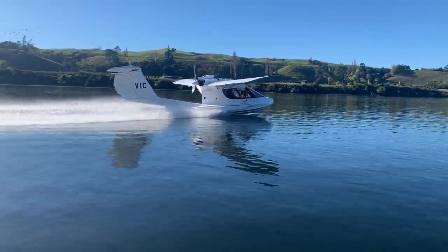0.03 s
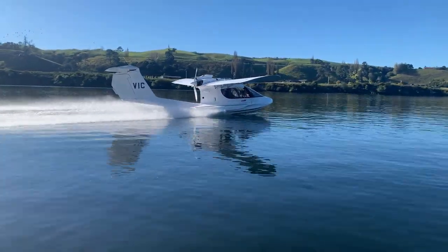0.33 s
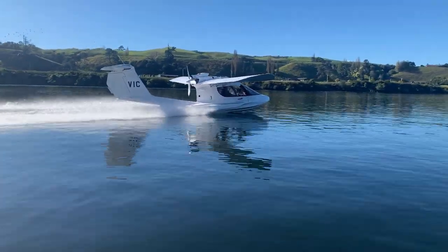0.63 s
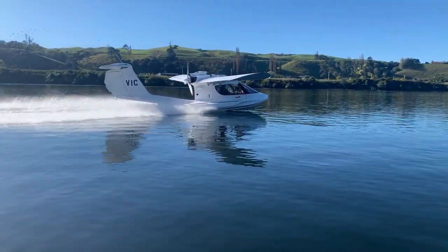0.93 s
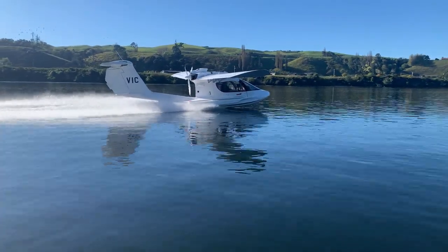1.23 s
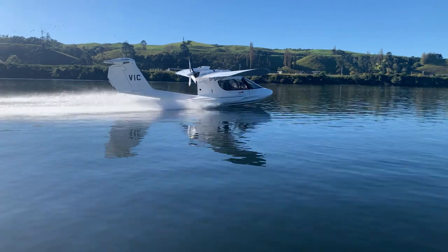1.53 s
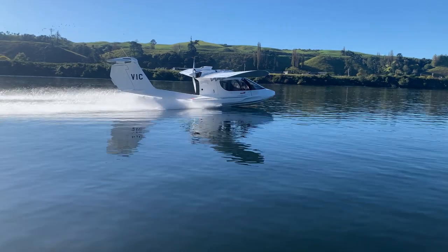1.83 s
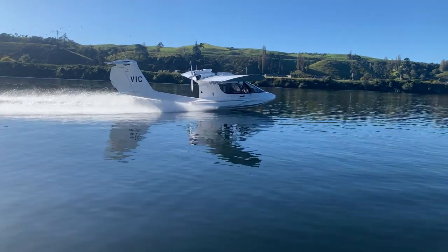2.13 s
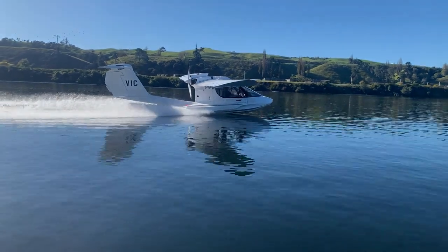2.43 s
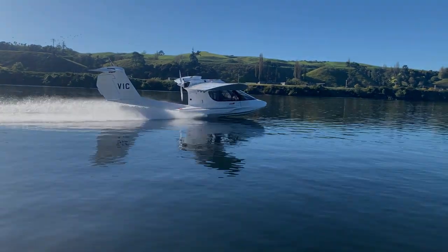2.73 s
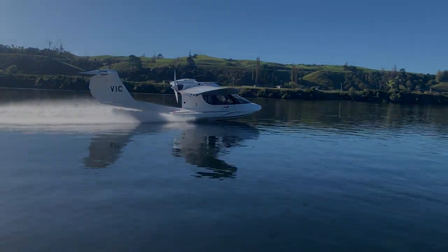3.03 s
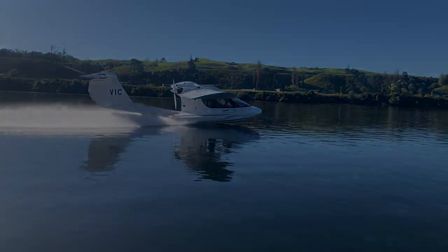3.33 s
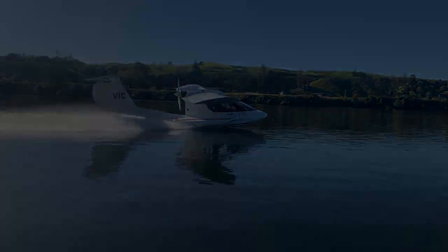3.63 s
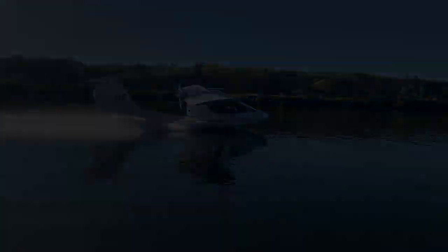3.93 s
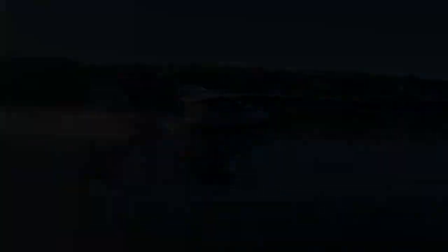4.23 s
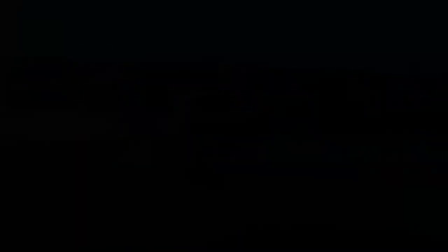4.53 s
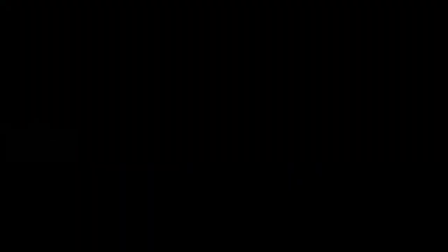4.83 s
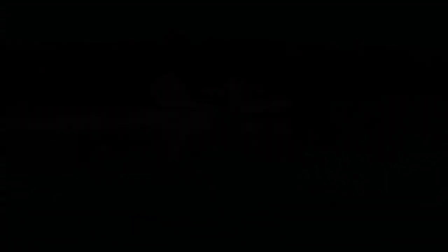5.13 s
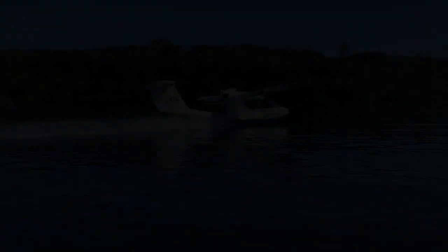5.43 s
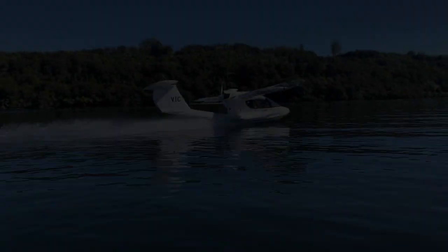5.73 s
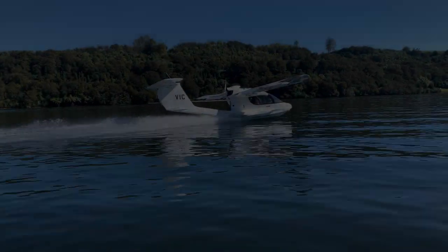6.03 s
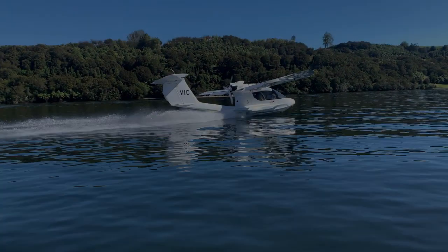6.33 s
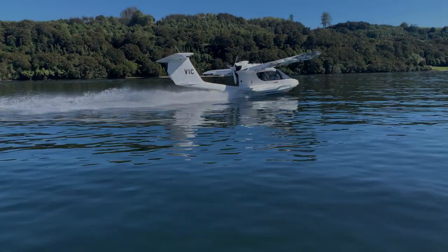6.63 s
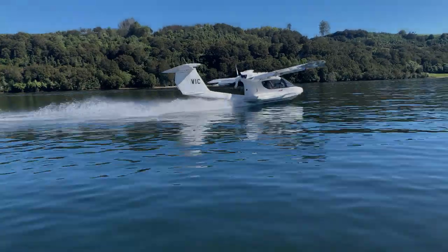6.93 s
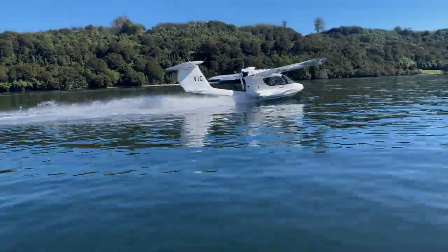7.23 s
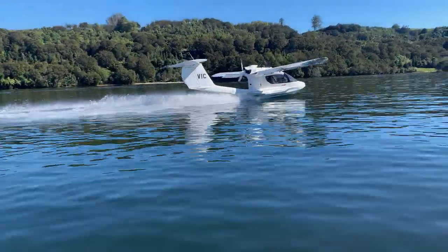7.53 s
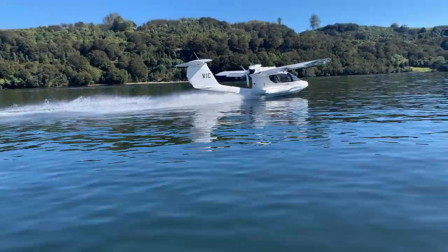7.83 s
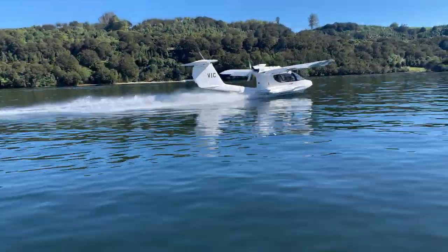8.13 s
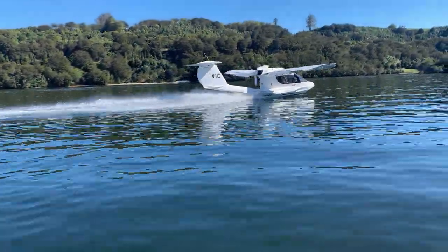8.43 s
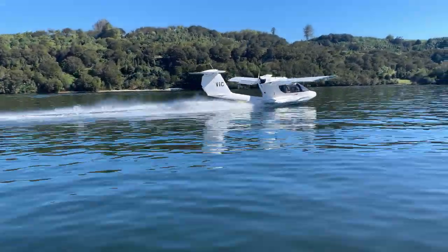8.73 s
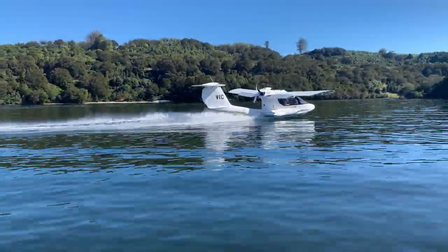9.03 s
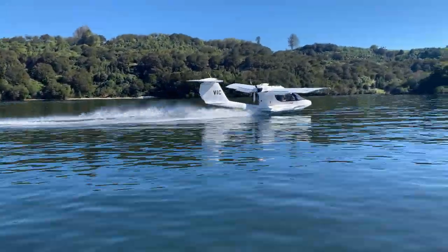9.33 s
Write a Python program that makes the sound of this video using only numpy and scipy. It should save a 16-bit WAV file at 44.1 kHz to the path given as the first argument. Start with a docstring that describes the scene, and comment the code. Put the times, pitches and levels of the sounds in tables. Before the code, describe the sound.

A small seaplane skims a lake, its propeller droning and its hull throwing hissing spray, heard from a humming motorboat alongside. Wind buffets the microphone. The propeller sinks away, the boat's wake washes up twice with hollow bubbling, and a wave slaps. Everything fades out, then returns with steadier, more distant spray, both engines, gurgles and surging splashes, while drops spatter nearby.

```python
"""A small seaplane planes across a lake, its propeller droning and its hull throwing up hissing spray.
It is heard from a motorboat alongside, in two runs joined by a fade. The boat's engine hums, its wake
washes up twice with resonating bubbles, water slaps and gurgles at its side, and drops spatter nearby.
Wind buffets a closely spaced pair of microphones."""
import sys
import numpy as np
from scipy import signal
from scipy.fft import rfft, irfft
from scipy.io import wavfile
from scipy.ndimage import uniform_filter1d, minimum_filter1d

SR = 44100
rng = np.random.default_rng(int(sys.argv[2]) if len(sys.argv) > 2 else 0)


def dump_mix(stems):
    """Bounce the given channels to the path in sys.argv[1] as a 16-bit WAV at rate SR."""
    frames = np.atleast_2d(stems).T  # one column per channel
    limited = np.clip(frames, -1, 1)  # hard clip at full scale
    pcm = np.round(limited * 32767).astype(np.int16)
    wavfile.write(sys.argv[1], SR, pcm)


N = 418950
TIME = np.arange(N) / SR
EDGE_HZ = 15650
FRAMING = dict(nperseg=1024, noverlap=768)

# Second-run spray and splash at the microphone pair.
# Each row: frequency in Hz, in-phase coherence, quadrature coherence, left over right in dB.
SECOND_STEREO = [(280, 1.0, 0.0, -2), (420, 0.82, 0.14, 3), (610, 0.3, -0.28, -2.5),
                 (640, -0.6, -0.11, -3.5), (990, 0.67, -0.19, 1.5), (1380, 0.17, 0.37, 4),
                 (2020, 0.15, 0.1, 0.5), (2740, -0.31, 0.47, -3.5), (4180, 0.38, 0.11, -3.5),
                 (5230, -0.28, 0.22, 0), (6200, 0.27, 0.064, -1), (7560, 0.68, 0.0, -0.5),
                 (10300, -0.75, -0.039, 0), (13000, 0.83, -0.05, -0.0)]


def gain_of(db):
    """Decibels to amplitude."""
    return 10 ** (np.asarray(db) / 20)


def unit_rms(x):
    """Scales to rms 1."""
    return x / np.sqrt(np.mean(x ** 2) + 1e-20)


def over_time(rows):
    """Each column of a time table at every sample."""
    times_s, *columns = np.transpose(rows)
    return [np.interp(TIME, times_s, column) for column in columns]


def over_frequency(rows, hz):
    """Each column of a frequency table at hz, interpolated on a log axis."""
    knots_hz, *columns = np.transpose(rows)
    return [np.interp(np.log(hz + 1), np.log(knots_hz + 1), column) for column in columns]


def wander(rate_hz):
    """Random drift of rms 1, low-passed at rate_hz."""
    steps_s = TIME[::100]
    hz = np.fft.rfftfreq(len(steps_s), steps_s[1])
    drift = irfft(rfft(rng.standard_normal(len(steps_s))) / (1 + (hz / rate_hz) ** 4), len(steps_s))
    return np.interp(TIME, steps_s, unit_rms(drift))


def swell(crest_s, hold_s, rise_s, fall_s):
    """Gaussian rise to 1, hold, exponential fall."""
    early_s, late_s = np.maximum(crest_s - TIME, 0), np.maximum(TIME - crest_s - hold_s, 0)
    return np.exp(-np.minimum((early_s / rise_s) ** 2 + late_s / fall_s, 20))


def band(x, low_hz, high_hz):
    """Band-pass, scaled to rms 1."""
    sos = signal.butter(2, [low_hz, high_hz], "bandpass", fs=SR, output="sos")
    return unit_rms(signal.sosfilt(sos, x))


def impacts(shape, per_s, spread_db):
    """Randomly timed impulses, mostly small."""
    size = gain_of(spread_db * np.minimum(rng.exponential(1, shape), 3))
    return size * (rng.random(shape) < per_s / SR)


def pops(per_s, spread_db, low_hz, high_hz, crosstalk=1.0):
    """Drops or bubbles pop close by; crosstalk 1 centres them."""
    ticks = impacts((2, N), per_s, spread_db) * rng.choice([-1., 1.], (2, N))
    return band(ticks + crosstalk * ticks[::-1], low_hz, high_hz)


def water(colour, stereo, per_s, spread_db, drop_share, clump_db, patchy_db, mist_hz=8000):
    """Falling water: hiss and drops in clumps, partly coherent in stereo; mist keeps the top smooth."""
    drops = unit_rms(impacts(N, per_s, spread_db) * rng.choice([-1., 1.], (2, N)))
    clumps = gain_of(clump_db * wander(93))
    hz, _, hiss = signal.stft(clumps * rng.standard_normal((2, N)), SR, **FRAMING)
    patter = signal.stft(clumps * drops, SR, **FRAMING)[2]
    hz = hz[:, None]
    share = drop_share / (1 + (hz / mist_hz) ** 2)
    left, independent = np.sqrt(1 - share) * hiss + np.sqrt(share) * patter
    in_phase, quadrature, balance_db = over_frequency(stereo, hz)
    width = np.clip((hz - 250) / 90, 0, 1)  # mono bass
    coherence = 1 + width * (in_phase + 1j * quadrature - 1)
    coherence /= np.maximum(abs(coherence), 1)
    right = coherence.conj() * left + np.sqrt(np.maximum(1 - abs(coherence) ** 2, 0)) * independent
    balance = gain_of(width * balance_db)
    pair = np.array([left * balance, right]) / np.sqrt(1 + balance ** 2)
    patches = uniform_filter1d(rng.standard_normal(left.shape), 9, axis=0)
    patches = unit_rms(uniform_filter1d(patches, 8, axis=1))  # 9 bins by 8 frames
    pair *= gain_of(over_frequency(colour, hz)[0] + patchy_db * patches)
    return unit_rms(signal.istft(pair, **FRAMING)[1][:, :N])


def drone(curve, lines, wobble, waver_db, fray_rad, dulling=0.0, throb_db=0.0, throb_hz=3.9):
    """Tones of a shaft whose speed wobbles; moving air wavers them and frays the higher ones most."""
    hz, level_db = over_time(curve)
    cycles = np.cumsum(hz * (1 + wobble * wander(7.9))) / SR
    slope_db_per_oct = dulling * (level_db - level_db.max())
    tones = np.zeros(N)
    for multiple, db in lines:
        jitter_rad = fray_rad * (multiple - 1) * wander(22.4)
        swing_db = throb_db * min(multiple - 1, 1) * wander(throb_hz)
        line_db = db + slope_db_per_oct * np.log2(multiple) + waver_db * wander(11.4) + swing_db
        tones += gain_of(line_db) * np.cos(2 * np.pi * (multiple * cycles + rng.random()) + jitter_rad)
    return np.sqrt(2) * gain_of(level_db) * tones


def wind(run, breeze_db=-35.5, eddy_s=0.083):
    """Eddies thump both microphones alike; gusts over a light breeze set their force."""
    # Rumble spectra. Each row: frequency in Hz, relative level in dB.
    first_colour = [(10, -33), (22, -18.5), (35, -31), (50, -1), (75, 5.5), (120, 2), (170, -17.5),
                    (260, -11), (600, -54), (2000, -83)]
    second_colour = [(10, -32), (22, -27), (35, -7), (50, -2.5), (80, 2.5), (125, 4.5), (180, -8),
                     (260, -9), (600, -53), (2000, -80)]
    # Each row: crest in seconds, hold in seconds, relative strength in dB.
    gusts = [(0.032, 0.043, -20.5), (0.282, 0.07, -21.5), (0.468, 0.16, -23.5), (0.657, 0.05, -21),
             (0.905, 0.077, -21.5), (1.29, 0.057, -20.5), (1.45, 0.17, -25), (1.7, 0.44, -29),
             (3.65, 0.41, -32), (4.3, 0.041, -33), (5.7, 0.22, -26), (5.94, 0.12, -25.5),
             (6.133, 0.16, -24), (6.48, 0.07, -25), (7.25, 0.19, -23.5), (7.54, 0.15, -23.5),
             (7.9, 0.04, -28), (8.22, 0.098, -24.5), (8.46, 0.03, -35), (8.67, 0.09, -22.5)]
    colour, gain_db = (first_colour, 5.0) if run == 1 else (second_colour, 2.5)
    force = gain_of(breeze_db)
    for crest_s, hold_s, db in gusts:
        force = np.maximum(force, gain_of(db) * swell(crest_s, hold_s, rise_s=0.045, fall_s=0.046))
    spectrum = gain_of(over_frequency(colour, np.fft.rfftfreq(N, 1 / SR))[0])
    rumble = irfft(rfft(rng.standard_normal(N)) * spectrum, N)
    local_rms = np.sqrt(uniform_filter1d(rumble ** 2, round(eddy_s * SR)))
    return gain_of(gain_db) * force * rumble / local_rms


def droplets():
    """Fine drops fizz near the microphones."""
    # Each row: time in seconds, level in dB.
    levels = [(0, -41.5), (1.65, -48), (2.1, -49), (3.0, -56), (3.5, -53), (3.9, -46.5), (4.6, -49.5)]
    return gain_of(over_time(levels)[0]) * pops(per_s=310, spread_db=4.0, low_hz=6960, high_hz=13500)


def gurgles():
    """Large bubbles churn along the side of the boat."""
    # Each row: crest in seconds, hold in seconds, level in dB.
    churns = [(7.2, 0.34, -39), (7.65, 0.35, -36.5), (8.65, 0.13, -33.5)]
    force = sum(gain_of(db) * swell(s, hold_s, rise_s=0.15, fall_s=0.059) for s, hold_s, db in churns)
    return force * pops(per_s=500, spread_db=3.5, low_hz=302, high_hz=534, crosstalk=0.91)


def slap(crest_s=4.281, level_db=-19, pitches_hz=(350, 480)):
    """Two air pockets trapped between a wave and the boat ring briefly."""
    ring = sum(np.sin(2 * np.pi * hz * (TIME - crest_s)) for hz in pitches_hz)
    return gain_of(level_db) * swell(crest_s, hold_s=0.009, rise_s=0.0042, fall_s=0.005) * ring


def spatters(ring_db=-3, fall_s=0.0014, band_ratio=1.95):
    """Large drops crack on the water close by, each with a very short ring."""
    # Each row: start in seconds, level in dB, pitch in Hz.
    drops = [(0.193, -17, 2500), (0.442, -22, 2700), (1.854, -27, 6300), (2.055, -18, 2200),
             (2.663, -30, 6000), (3.798, -20, 1890), (3.888, -22, 2000), (4.101, -31, 5500),
             (4.197, -20, 2100), (4.371, -24, 2700), (5.777, -22, 2800), (6.228, -20, 1800),
             (7.069, -21, 2030), (7.16, -24, 2900), (8.109, -27, 2600), (8.499, -24, 3370),
             (8.658, -30, 5500), (8.857, -24, 3000), (9.06, -22, 2500), (9.116, -21, 2100),
             (9.182, -24, 3800), (9.201, -27, 3800), (9.363, -23, 2260), (9.48, -23, 3210)]
    t = np.arange(1024) / SR
    track = np.zeros((2, N + len(t)))
    for start_s, db, hz in drops:
        noise = rng.standard_normal(len(t)) + .5 * rng.standard_normal((2, len(t)))
        crack = band(noise, hz / band_ratio, min(hz * band_ratio, EDGE_HZ))
        ring = gain_of(ring_db) * np.sin(2 * np.pi * hz * t)
        start = round(start_s * SR)
        track[:, start:start + len(t)] += gain_of(db) * np.exp(-t / fall_s) * (crack + ring)
    return track[:, :N]


def bubble_cloud(wash, tilt_db_per_oct, boost_db, pivot_hz=600, width_hz=173):
    """Tilts the wash and boosts its bubble resonance, which rises as the cloud breaks up."""
    # Each row: time in seconds, mean resonance in Hz.
    pitches = [(1.65, 335), (1.88, 360), (2.1, 490), (2.4, 510), (3.5, 471), (3.75, 520), (4.0, 565),
               (4.3, 490)]
    hz, frames_s, spectra = signal.stft(wash, SR, **FRAMING)
    hz = hz[:, None] + 1
    octaves = np.clip(np.log2(hz / pivot_hz), -2, 2)
    centre_hz = np.interp(frames_s, TIME, over_time(pitches)[0] * (1 + 0.23 * wander(16)))
    resonance_db = np.interp(frames_s, TIME, boost_db) / (1 + (2 * (hz - centre_hz) / width_hz) ** 2)
    spectra = spectra * gain_of(octaves * np.interp(frames_s, TIME, tilt_db_per_oct) + resonance_db)
    return signal.istft(spectra, **FRAMING)[1][:, :N]


def wake(ebb_s=0.9, thin_db_per_oct=3.5):
    """Each surge of the boat's wake starts splashy, turns hollow at its crest and thins as it ebbs."""
    # Wash spectrum. Each row: frequency in Hz, relative level in dB.
    colour = [(40, -19), (150, 0.5), (230, -3), (320, -2), (430, -1), (700, -2), (880, -5.5), (1100, -2),
              (1700, -6.5), (3500, -18), (5200, -28.5), (15500, -66)]
    # Wash at the microphones. Columns as in SECOND_STEREO.
    stereo = [(229, 1.0, 0.12, -2), (380, 0.84, -0.026, 0), (534, 0.87, -0.072, -1.5),
              (713, 0.83, -0.043, -14.5), (1150, 0.19, 0.32, 2.5), (2070, 0.11, 0.27, -6.5),
              (3800, 0.24, 0.061, 4)]
    # Each row: crest, hold and rise in seconds, level in dB, crest tilt in dB/octave, resonance in dB.
    surges = [(1.92, 0.19, 0.68, -17.5, 0, 5), (3.54, 0.44, 0.28, -18, -1.9, 7)]
    wash = water(colour, stereo, per_s=1300, spread_db=3.0, drop_share=0.36,
                 clump_db=1.13, patchy_db=1.5)
    fullness = np.array([swell(s, hold_s, rise_s, ebb_s) for s, hold_s, rise_s, *_ in surges])
    *_, level_db, crest_tilt, cloud_db = np.transpose(surges)
    tilt_db_per_oct = crest_tilt @ fullness / fullness.sum(0) + thin_db_per_oct * (1 - fullness.max(0))
    boost_db = (cloud_db[:, None] * fullness).max(0)
    envelope = (gain_of(level_db)[:, None] * fullness).max(0)
    return envelope * bubble_cloud(wash, tilt_db_per_oct, boost_db)


def boat_engine(run):
    """Firing hum: eases off and dulls in run 1, steadier and a little faster in run 2."""
    # Each row: time in seconds, firing rate in Hz, level in dB.
    first_curve = [(0, 94.8, -12.5), (1.45, 94.1, -13), (1.9, 94.4, -19.5), (2.4, 94.5, -18.5),
                   (3.3, 94.7, -20), (3.95, 93.5, -21.5), (4.4, 93, -27)]
    second_curve = [(5.1, 104, -23), (5.8, 102.9, -20.5), (6.6, 101, -20), (8.0, 99.82, -21),
                    (9.4, 99.95, -23.5)]
    # Each row: multiple of the firing rate, relative level in dB.
    first_lines = [(1, -1), (1.25, -18), (1.7, -16.5), (2, -13.5), (3, -17), (4.002, -26.5), (5, -15.5),
                   (6.002, -24.5)]
    second_lines = [(1, -1), (2, -11), (3, -21.5), (4, -21), (5, -27), (8, -29), (10, -25)]
    if run == 1:
        return drone(first_curve, first_lines, wobble=0.0023, waver_db=1.0, fray_rad=0.19,
                     dulling=0.47, throb_db=1.5)
    return drone(second_curve, second_lines, wobble=0.0024, waver_db=0.1, fray_rad=0.06)


def ripple_db():
    """Ripples under the hull make the spray level flutter."""
    return 0.43 * wander(12)


def near_spray(gain_db=16.0):
    """Spray roars close by, its level following its nearness."""
    # Spray spectrum. Each row: frequency in Hz, relative level in dB.
    colour = [(40, -38), (130, 0.5), (260, -3.5), (450, -3.5), (700, -7), (900, -6), (1150, -7),
              (1700, -8.5), (3800, -14.5), (5100, -20.5), (7500, -25.5), (10500, -33.5), (12700, -31.5),
              (15500, -44)]
    # Spray at the microphones. Columns as in SECOND_STEREO.
    stereo = [(282, 1.0, -0.13, -1), (419, 0.94, 0.26, -2), (620, 0.34, -1, 0), (660, -0.83, -0.78, -2),
              (960, 0.81, -0.45, 3), (1380, 0.39, 0.31, 3), (1960, 0.25, 0.21, -0.3),
              (2710, -0.44, -0.068, -6), (4000, 0.52, -0.025, -4), (5000, -0.31, -0.22, 2),
              (6140, 0.28, 0.02, 2.5), (8400, 0.57, -0.0, -1), (11060, -1.1, -0.01, 1.5),
              (12700, 0.89, -0.01, -0.5)]
    # Each row: time in seconds, level in dB before gain_db.
    levels = [(0, -34.5), (0.17, -32.5), (0.28, -35.5), (0.95, -35), (1.3, -32.5), (1.65, -33.5),
              (2.0, -38), (2.45, -40.5), (2.75, -37.5), (3.3, -38.5), (3.65, -43), (4.3, -44)]
    spray = water(colour, stereo, per_s=2000, spread_db=2.0, drop_share=0.5, clump_db=1.0, patchy_db=1.5)
    return gain_of(over_time(levels)[0] + gain_db + ripple_db()) * spray


def far_spray(lift_db):
    """Steady spray farther off, raised by lift_db."""
    # Spray spectrum. Each row: frequency in Hz, relative level in dB.
    colour = [(40, -51), (130, 0.5), (260, -6), (450, -2.5), (700, -7.5), (900, -7), (1150, -8.5),
              (1700, -9.5), (3800, -14), (5100, -20.5), (7500, -23.5), (10500, -26.5), (12700, -28),
              (15500, -41.5)]
    # Each row: time in seconds, level between surges in dB.
    levels = [(5.3, -26.5), (6.6, -26.5), (9.2, -26.5), (9.5, -26)]
    spray = water(colour, SECOND_STEREO, per_s=2000, spread_db=3.0, drop_share=0.3,
                  clump_db=1.07, patchy_db=1.24)
    return gain_of(over_time(levels)[0] + lift_db + ripple_db()) * spray


def hull_surges():
    """The hull digs in: water splashes up and crackles down. Returns the sound and spray lift in dB."""
    # Splash spectrum. Each row: frequency in Hz, relative level in dB.
    colour = [(300, -35), (700, -14), (1100, 13.5), (1700, 4), (3000, -2), (6000, -30), (15500, -55)]
    # Each row: crest and hold in seconds, then splash level, crackle level and spray lift in dB.
    surges = [(6.27, 0.06, -47, -49, 2.3), (6.946, 0.21, -32.5, -46, 3.1), (7.85, 0.12, -38, -53, 3),
              (8.512, 0.035, -43, -59, 1.5), (9.008, 0.19, -32.5, -36.5, 1.3)]
    splash = water(colour, SECOND_STEREO, per_s=1100, spread_db=2.5, drop_share=0.6,
                   clump_db=-0.5, patchy_db=2.0)
    ticks = impacts(N, per_s=450, spread_db=3.3) * (1 + .5 * rng.standard_normal((2, N)))
    crackle = band(ticks, low_hz=1800, high_hz=4500)
    swells = np.array([swell(s, hold_s, rise_s=0.38, fall_s=0.15) for s, hold_s, *_ in surges])
    *_, splash_db, crackle_db, lift_db = np.transpose(surges)
    thrown = (gain_of(splash_db) @ swells) * splash + (gain_of(crackle_db) @ swells) * crackle
    return thrown, lift_db @ swells


def propeller(run):
    """The seaplane's propeller beats the air: sinks away in run 1, holds a little faster in run 2."""
    # Each row: time in seconds, beat rate in Hz, level in dB.
    first_curve = [(0, 59.14, -23), (1.5, 58.65, -23), (1.85, 59.8, -36.5)]
    second_curve = [(5.1, 62.42, -28), (7.0, 62.71, -23), (9.4, 62.3, -23.5)]
    # Each row: multiple of the beat rate, relative level in dB.
    lines = [(2, -10), (3, -0.5), (4, -15.5), (5, -21.5), (6, -23.5), (7, -21.5), (9, -31.5)]
    if run == 1:
        return drone(first_curve, lines, wobble=0.0029, waver_db=2.0, fray_rad=0.087)
    return drone(second_curve, lines, wobble=0.002, waver_db=2.4, fray_rad=0.097)


def scene(fade_out_s=(4.384, 4.94), cut_s=4.882, fade_in_s=(4.915, 5.62)):
    """Run 1 fades and cuts to silence; run 2 fades in."""
    first = near_spray() + wake() + slap() + droplets() + wind(1) + boat_engine(1) + propeller(1)
    thrown, lift_db = hull_surges()
    second = far_spray(lift_db) + thrown + gurgles() + wind(2) + boat_engine(2) + propeller(2)
    fade_out = np.interp(TIME, fade_out_s, (1, 0)) ** 2 * (TIME < cut_s)
    fade_in = np.interp(TIME, fade_in_s, (0, 1)) ** 2
    return fade_out * first + fade_in * second + (fade_out + fade_in) * spatters()


def record(dry, ceiling=0.92):
    """Peak limiter, then low-pass at EDGE_HZ."""
    allowed_gain = np.minimum(ceiling / (abs(dry).max(0) + 1e-9), 1)
    gain = uniform_filter1d(minimum_filter1d(allowed_gain, size=900), size=900)
    lowpass = signal.firwin(511, EDGE_HZ, window=("kaiser", 9), fs=SR)
    return signal.oaconvolve(dry * gain, lowpass[None], "same")


dry = scene()
out = record(dry)
dump_mix(out)
```